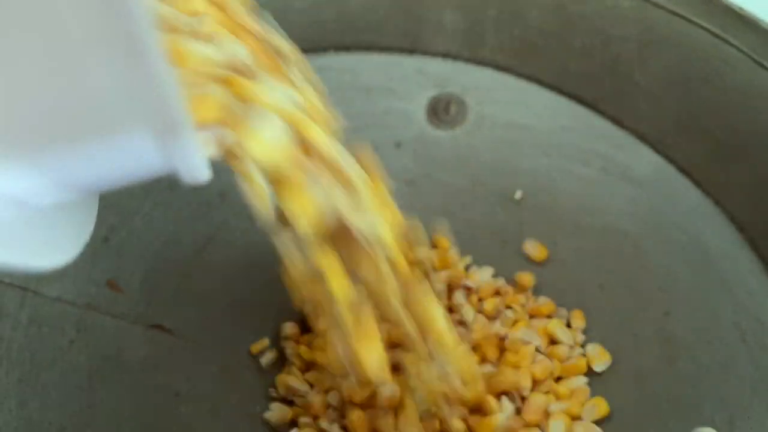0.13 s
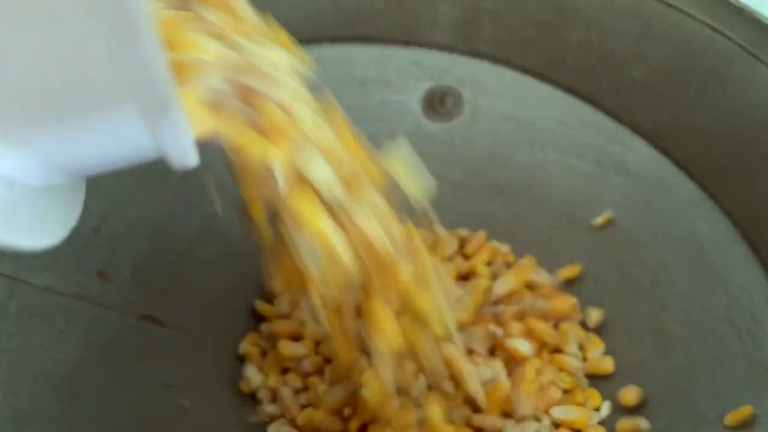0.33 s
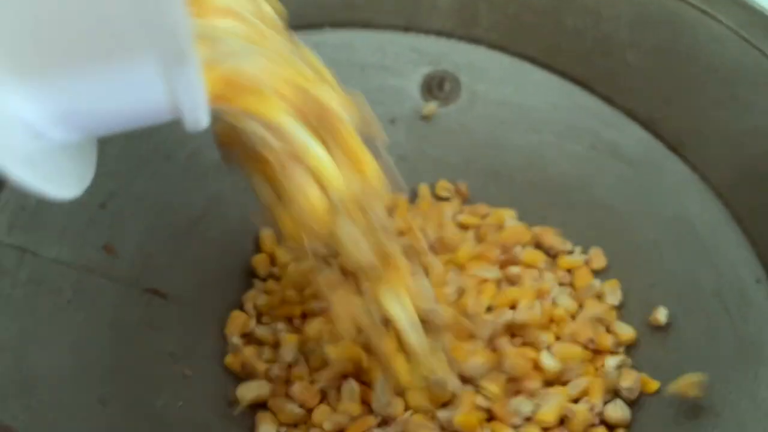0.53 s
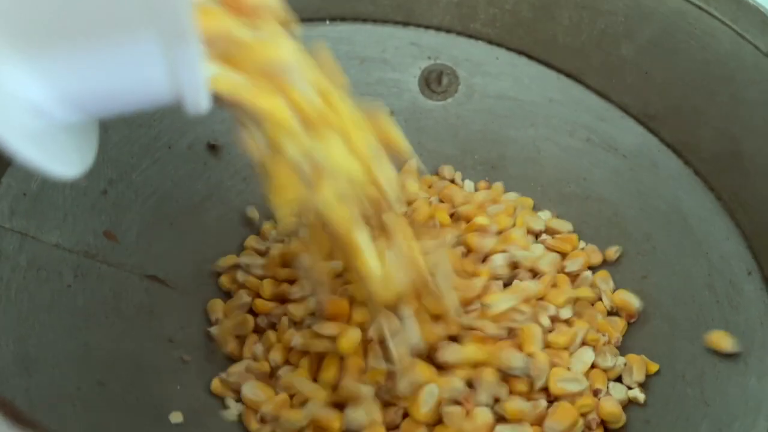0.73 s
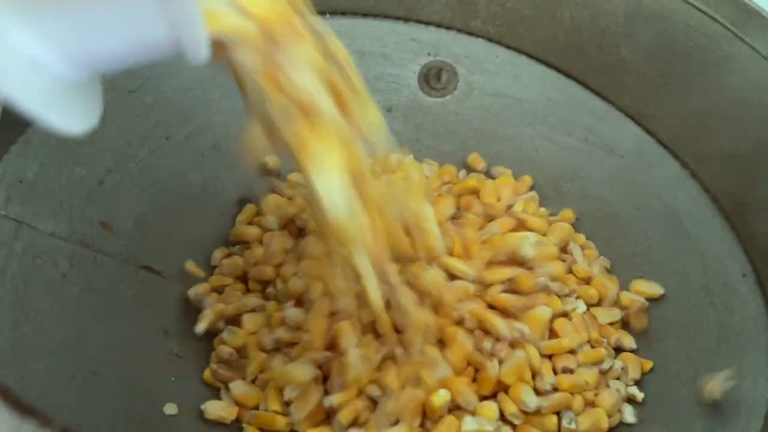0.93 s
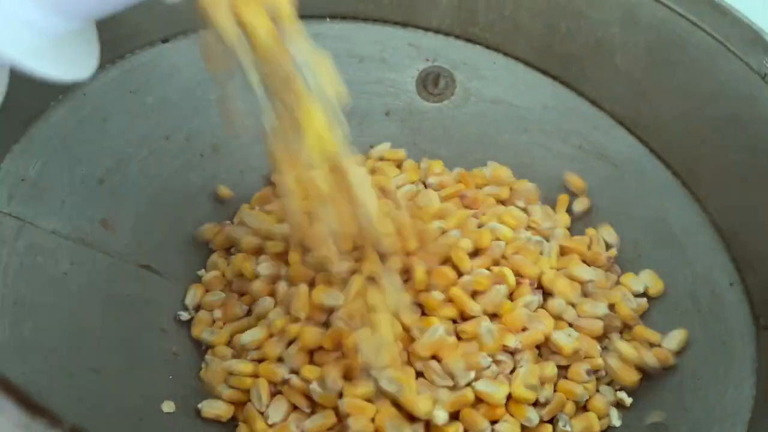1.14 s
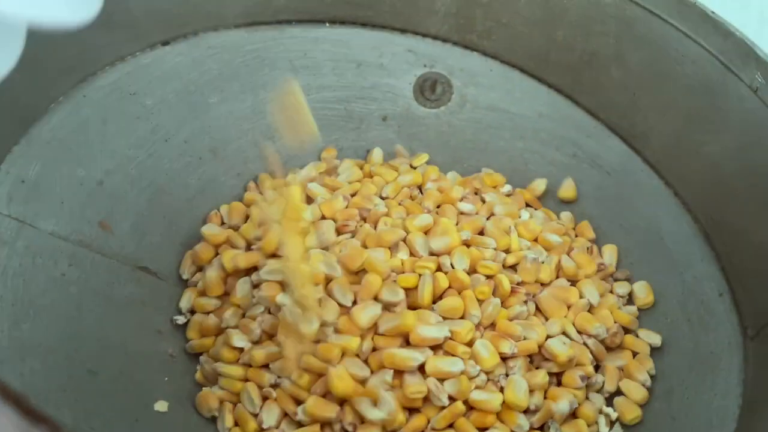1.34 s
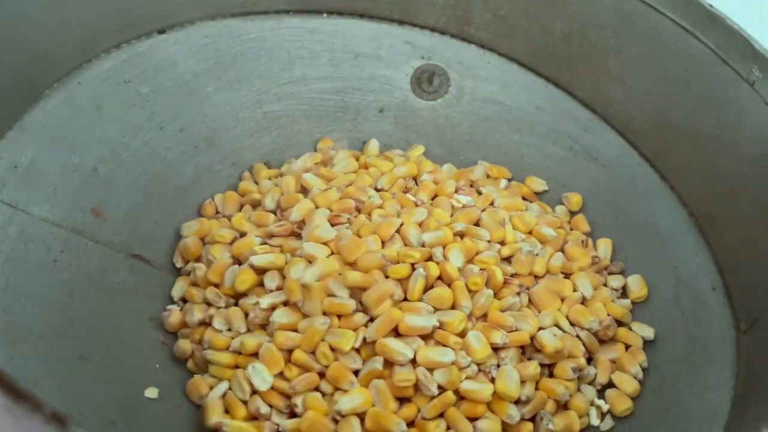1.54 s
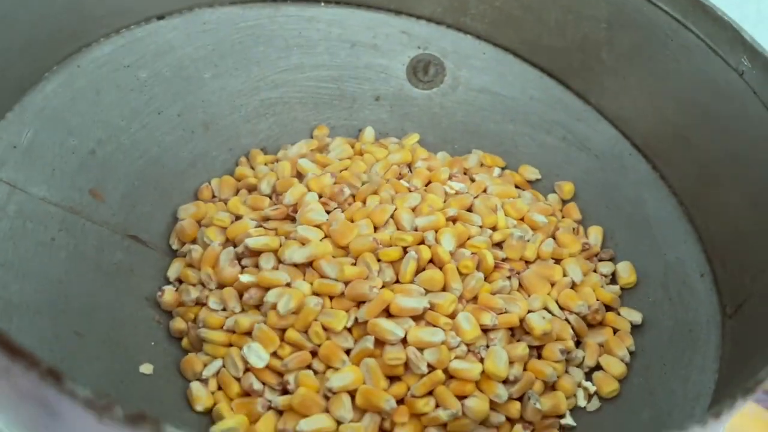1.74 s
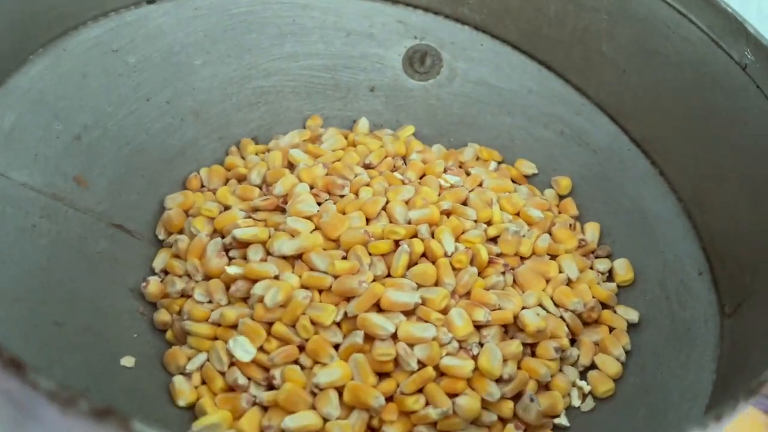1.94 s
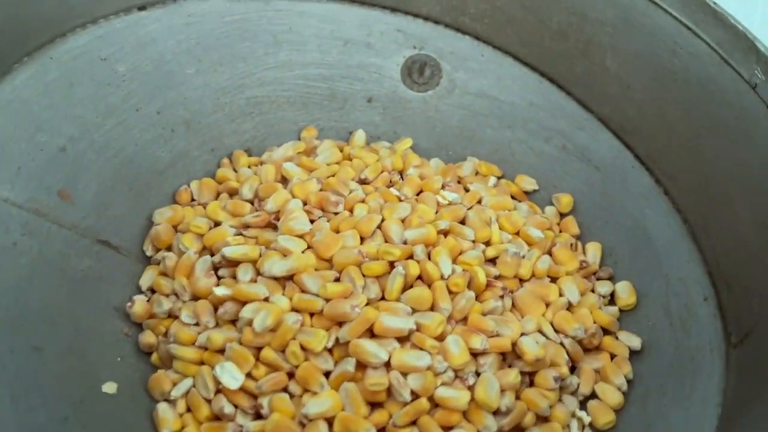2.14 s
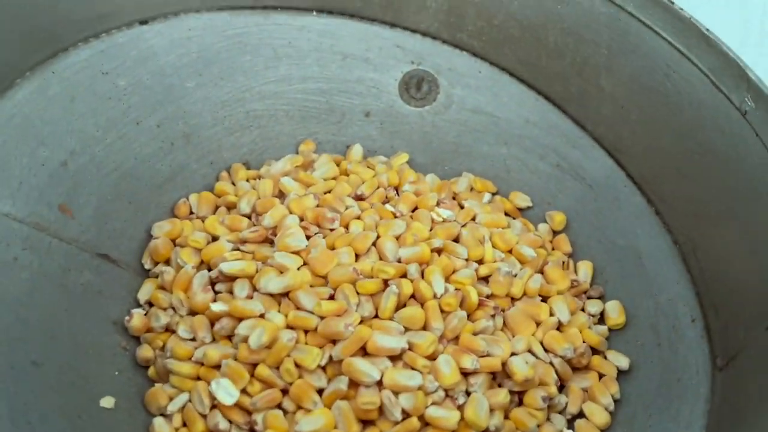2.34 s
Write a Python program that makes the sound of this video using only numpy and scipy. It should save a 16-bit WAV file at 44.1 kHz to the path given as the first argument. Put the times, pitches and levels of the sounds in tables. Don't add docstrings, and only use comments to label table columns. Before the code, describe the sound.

Dense bright rattle of corn poured into a metal hopper, stopping before a hollow cup scrape and bump

```python
import sys
import numpy as np
from scipy import signal
from scipy.fft import rfft, irfft
from scipy.io import wavfile
from scipy.ndimage import uniform_filter1d

SR = 44100
rng = np.random.default_rng(int(sys.argv[2]) if len(sys.argv) > 2 else 0)


def inscribe(sig):
    pcm = np.round(np.clip(np.atleast_2d(sig).T, -1, 1) * 32767)
    wavfile.write(sys.argv[1], SR, pcm.astype(np.int16))


def voltage_ratio(level):
    return 10 ** (np.asarray(level, float) / 20)


N = 110029
T = np.arange(N) / SR

# freq_hz, density_db_per_hz
SHOP_SPECTRUM = [(32, -49), (58, -1), (110, -9), (220, -13.5), (600, -18), (2300, -22), (9000, -31.5),
                 (13000, -58)]
# time_s, level_db
SHOP_LEVEL = [
    (0, -69),
    (.5, -69),
    (.85, -55.5),
    (1.7, -57.5),
    (2.1, -50),
    (2.49, -59.5),
]

# time_s, scrape_db, hollow_db, hollow_hz
CUP_DRAG = [(1.62, -56, -50, 318.6), (1.655, -46, -57, 320), (1.76, -42.5, -44.5, 314.6),
            (1.86, -46.5, -49, 325), (1.93, -41, -37, 337.8), (1.945, -37, -31, 339),
            (2.03, -33, -32.5, 355.6), (2.07, -33.5, -40, 345.8), (2.14, -30.5, -38, 348.2),
            (2.17, -34.5, -48.5, 334.8), (2.3, -37.5, -54, 335), (2.4, -44.5, -59.5, 331.8),
            (2.47, -54.5, -72, 341.7)]
# freq_hz, density_db_per_hz
SCRAPE_SPECTRUM = [(200, -35), (500, -17), (1100, -6.5), (2200, 3), (3500, -6), (8500, -13), (11400, -11.5),
                   (12500, -40)]
# freq_hz, width_hz, level_db
CUP_WALLS = [(1210, 210, -16.5), (1630, 380, -16.5), (2140, 68, -17.5), (2280, 320, -16)]
# time_s, level_db
FLANK_PRESSURE = [
    (1.62, -24),
    (1.93, -19),
    (1.97, -6.5),
    (2.11, -9.5),
    (2.17, -39),
]
FLANK_HZ, FLANK_WIDTH_HZ, HOLLOW_WIDTH_HZ = 830, 26, 42
GRIT_PER_S, GRIT_SCATTER_DB = 5000, 0.5
# start_s, level_db, pitch_hz, t60_s
CUP_BUMPS = [
    (2.205, -28.5, 134, 0.038),
    (2.251, -27, 61.6, 0.083),
]

# freq_hz, width_hz, level_db
BOWL_MODES = [(298.3, 30.4, -2.5), (495, 83, 0), (1005, 175, -4.5), (1906, 100, 1.5), (2360, 84, 1.5)]
# time_s, level_db
BOWL_LEVEL = [(0, -57), (.3, -55), (.75, -51.5), (.9, -48.5), (1.05, -49.5), (1.17, -48), (1.28, -53),
              (1.4, -58), (1.64, -67)]

# time_s, level_db, kernels_per_s
STREAM_FLOW = [(0, -25, 4760), (.05, -27.5, 4930), (.2, -31, 5000), (.3, -32.5, 4900), (.7, -34.5, 4890),
               (.88, -30, 5700), (1, -33.5, 4920), (1.2, -34.5, 5130), (1.27, -35.5, 3400),
               (1.33, -44.5, 1200), (1.4, -50, 480), (1.5, -59.5, 300), (1.64, -63, 240)]
# start_s, peak_db, loudest_hz
CLUMPS = [(.003, -14.5, 5930), (.012, -18.5, 7950), (.021, -21, 5540), (.027, -16, 4280),
          (0.049, -18, 8000), (0.072, -22, 3500), (0.114, -14, 3300), (0.165, -19, 3480),
          (1.106, -19.5, 6000),
          (0.0634, -13.5, 6200), (0.1029, -12.5, 5900), (0.1573, -11.5, 5600), (0.1731, -12.5, 5340),
                 (0.231, -25, 6000), (0.2485, -19, 5300), (0.2955, -27, 4300), (0.3204, -20.5, 4600),
                 (0.3326, -25, 3400), (0.3502, -21, 4580), (0.3901, -20, 7050), (0.3948, -24, 7140),
                 (0.4176, -19, 6300), (0.475, -19, 5100), (0.4882, -20.5, 6300), (0.5323, -22, 5523),
                 (0.5552, -22, 4700), (0.5621, -20, 6700), (0.6003, -37, 5000), (0.6136, -24, 5100),
                 (0.6675, -23, 3020), (0.6861, -42, 7900),
          (0.7204, -21, 7360), (0.7346, -17.5, 3750), (0.752, -36, 5600), (0.785, -24, 9400),
               (0.8012, -34, 8400), (0.8427, -49, 6400), (0.8804, -35, 8700), (0.9038, -21, 3900),
               (0.91, -22, 7400), (0.9246, -19, 5200), (0.9315, -17, 7000), (0.9648, -17, 4100),
               (1.0091, -29, 8080), (1.0178, -32, 6200), (1.0443, -31, 7300), (1.0704, -15.5, 5400),
               (1.0885, -15.5, 4050), (1.0997, -15.5, 5200), (1.134, -21.5, 6200), (1.1522, -15.5, 4220),
               (1.1832, -17, 4166), (1.2238, -23, 5900), (1.2324, -34, 6700), (1.248, -36, 6960),
               (1.2554, -25.5, 8010)]
# start_s, peak_db, loudest_hz
LONE_KERNELS = [(1.3139, -30, 7500), (1.3229, -21.5, 3650), (1.335, -32, 7200), (1.3492, -42, 8560),
                (1.3655, -40, 8000), (1.3762, -49, 5300), (1.3873, -30, 3600), (1.393, -38, 6760),
                (1.3993, -45, 4800), (1.4239, -34.5, 8170), (1.457, -43, 6200), (1.4734, -34, 2475),
                (1.4855, -39.5, 6130), (1.4973, -45, 3100), (1.534, -40.5, 4440), (1.543, -41, 9160),
                (1.5619, -21.5, 3170), (1.5863, -50, 3770), (1.593, -34, 4900), (1.6019, -34.5, 3500),
                (1.307, -34, 9000), (1.361, -37, 9000), (1.3838, -33, 9000), (1.404, -44, 5000),
                 (1.418, -37.5, 5950), (1.322, -24, 4400), (1.5618, -37.5, 2460), (1.5617, -31.5, 7950),
                 (1.5627, -21.5, 1000), (2.156, -38, 11500), (2.385, -48, 10000), (1.606, -53, 4500),
                 (1.569, -40, 2420), (1.741, -37, 5030), (1.803, -38, 2500), (1.8946, -45, 5000),
                 (1.939, -40, 4000), (1.96, -33.5, 7460), (2.479, -52, 2820)]
CLUMP_SPREAD_S, CLUMP_DB, LONE_SPREAD_S, LONE_DB = 0.0042, 1, 0.0012, 11.5

# freq_hz, density_db_per_hz
TICK_SPECTRUM = [(300, -42), (800, -19), (2000, -3), (3000, -5.5), (8500, 0.5), (11000, 9), (12400, -4.5),
                 (14500, -15)]
# time_s, level_db
GLINT_LEVEL = [(0, -7), (.6, -6), (.8, 5.5), (1.3, 6.5)]
GLINT_HZ = 13000
FOCUS_DB, FOCUS_FLOOR_DB = 9, 14
TICK_CYCLES, SCATTER_DB, COLOUR_DB = 12, 2.5, 2
# freq_hz, level_db, t60_s
STEEL_MODES = [(1470, -4.5, 0.18), (1952, -0.5, 0.1), (2365, 5.5, 0.066), (3293, 2.5, .06),
               (3786, 0.5, 0.09), (4400, 2, 0.057), (4700, 2, 0.056), (5700, -3.5, 0.073),
               (6000, 2.5, 0.053), (6670, -6, 0.097), (7650, 4.5, 0.054), (7850, 4, 0.035),
               (8290, 5.5, 0.041), (8520, 8.5, 0.023)]
# time_s, level_db
STEEL_RING = [
    (0, -2),
    (.3, -3.5),
    (1.2, -21.5),
    (1.64, -7.5),
]
TAIL_T60_S, TAIL_DB = 0.02, 1

# freq_hz, level_db
ECHO_SPECTRUM = [(120, -19), (450, -14), (1200, 1), (2200, -2.5), (6000, -8.5), (9000, -7.5), (10300, -47),
                 (16000, -11)]
# freq_hz, phase_rad
PORT_LEAD = [(700, 0.3), (1150, -0.26), (1450, -1.97), (2000, 0.18), (2800, 0.26), (5500, 0.92),
             (6500, 0.64), (7600, 0.8), (8300, -0.61),
             (9000, -.5), (9900, -.94 * np.pi), (10400, -1.06 * np.pi), (11800, -2 * np.pi),
                    (12400, -2 * np.pi), (13100, -3 * np.pi), (14400, -3 * np.pi), (15000, -4 * np.pi)]
# freq_hz, level_db
PORT_BALANCE = [(100, 0.5), (1100, 3), (1800, -1.5), (5000, 3.5), (8300, 0.5)]
ECHO_T60_S, CUP_ECHO_DB, CUP_LEAD_RAD = 0.039, 4.5, 0.9
TOP_HZ = 15750


def level(x, db):
    return x * voltage_ratio(db) / np.sqrt(np.mean(x ** 2))


def curve(table, column=1, times=T):
    rows = np.array(table)
    return np.interp(times, rows[:, 0], rows[:, column])


def along(table, hz):
    rows = np.array(table)
    return np.interp(np.log(np.maximum(hz, 1)), np.log(rows[:, 0]), rows[:, 1])


def colour(x, table):
    hz = np.fft.rfftfreq(N, 1 / SR)
    return irfft(rfft(x) * voltage_ratio(along(table, hz)), N)


def ring(x, hz, t60_s):
    pole = np.exp(2j * np.pi * hz / SR - np.log(1000) / (t60_s * SR))
    return signal.lfilter([1], [1, -pole], x).imag * np.sqrt(1 - abs(pole) ** 2)


def band(x, hz, width_hz):
    return ring(x, hz, np.log(1000) / (np.pi * width_hz))


def train(times, sizes):
    index = np.clip((times * SR).astype(int), 0, N - 1)
    return np.bincount(index, sizes, N)


def walk(rate_hz):
    hold = int(SR / rate_hz)
    steps = np.repeat(rng.standard_normal(N // hold + 1), hold)
    return 1.3 * uniform_filter1d(uniform_filter1d(steps, hold), hold)[:N]


def heavy_tail():
    return np.minimum(rng.exponential(size=N), 4)


def grit(per_s, scatter_db):
    hit = rng.random(N) < per_s / SR
    return hit * rng.standard_normal(N) * voltage_ratio(scatter_db * heavy_tail())


def shop():
    noise = level(colour(rng.standard_normal(N), SHOP_SPECTRUM), 0)
    return noise * voltage_ratio(curve(SHOP_LEVEL) + 2.1 * walk(5.56))


def cup_walls(rub):
    walls = level(colour(rub, SCRAPE_SPECTRUM), 0.43)
    for hz, width_hz, db in CUP_WALLS:
        walls = walls + level(band(rub, hz, width_hz), db)
    flank = level(band(rub, FLANK_HZ, FLANK_WIDTH_HZ), 0)
    return walls + flank * voltage_ratio(curve(FLANK_PRESSURE))


def cup_hollow():
    push = grit(1200, 2.9) + 1j * grit(1200, 2.0)
    slow = signal.lfilter([1], [1, -np.exp(-np.pi * HOLLOW_WIDTH_HZ / SR)], push)
    smooth = uniform_filter1d(slow.real, size=201) + 1j * uniform_filter1d(slow.imag, size=201)
    phase = 2 * np.pi * np.cumsum(curve(CUP_DRAG, column=3)) / SR
    return level((smooth * np.exp(1j * phase)).real, 0)


def cup_bump(start_s, db, hz, t60_s):
    u = np.maximum(T - start_s, 0)
    swell = 1 - np.exp(-u * hz * 3.8)
    return voltage_ratio(db) * np.sin(2 * np.pi * hz * u) * swell * np.exp(-np.log(1000) * u / t60_s)


def cup():
    rub = grit(GRIT_PER_S, GRIT_SCATTER_DB) * voltage_ratio(0.73 * walk(70))
    scrape = cup_walls(rub) * voltage_ratio(curve(CUP_DRAG))
    hollow = cup_hollow() * voltage_ratio(curve(CUP_DRAG, column=2))
    fade_in = np.clip((T - CUP_DRAG[0][0]) / 0.013, 0, 1)
    return (scrape + hollow) * fade_in + sum(cup_bump(*row) for row in CUP_BUMPS)


def bowl():
    push = grit(1500, 2.3) * voltage_ratio(0.8 * walk(10.7))
    hum = 0
    for hz, width_hz, db in BOWL_MODES:
        mode = band(band(push, hz, 1.59 * width_hz), hz, 1.58 * width_hz)
        hum = hum + voltage_ratio(db) * mode * np.sqrt(width_hz)
    fade_out = np.clip((BOWL_LEVEL[-1][0] - T) / 0.026, 0, 1)
    return level(hum, 5.86) * voltage_ratio(curve(BOWL_LEVEL)) * fade_out


def stream():
    per_s = np.maximum(curve(STREAM_FLOW, column=2), 50)
    surge = voltage_ratio(3 * walk(60))
    scatter_db = SCATTER_DB * heavy_tail()
    lands = rng.random(N) < per_s * surge / SR * (T < STREAM_FLOW[-1][0])
    db = curve(STREAM_FLOW) + scatter_db - 10 * np.log10(per_s / SR) - 14
    return T[lands], db[lands], 0 * T[lands]


def strikes(table, spread_s, db, count):
    rows = np.array(table)
    order = (np.arange(count) + rng.random((len(rows), count))) / count
    late = order ** 2 * 3.5 - 0.5
    fall_db = np.where(late < 0, -20, 5) * late - 3.1 * (abs(late) < 0.1)
    times = rows[:, :1] + spread_s * late
    return times.ravel(), (rows[:, 1:2] + db - fall_db).ravel(), np.repeat(rows[:, 2], count)


def focus_loss_db(hz, loudest_hz):
    octaves = np.log2(hz / np.maximum(loudest_hz, 1))
    return (loudest_hz > 0) * np.minimum(FOCUS_DB * octaves ** 2, FOCUS_FLOOR_DB)


def kernel_ticks(times, db, loudest_hz):
    ticks = 0
    fade = np.exp(-2 * np.log(1000) / (TAIL_T60_S * SR))
    for hz in 700 * 2 ** np.arange(0, 4.6, 1 / 3):
        sign, own_colour = rng.standard_normal((2, len(times)))
        glint_db = (hz > GLINT_HZ) * curve(GLINT_LEVEL, times=times)
        size = voltage_ratio(db + COLOUR_DB * own_colour - focus_loss_db(hz, loudest_hz) + glint_db)
        power = signal.lfilter([1 - fade], [1, -fade], train(times, size ** 2))
        hiss = np.sqrt(power + 1e-18) * rng.standard_normal(N)
        push = train(times, np.sign(sign) * size) + voltage_ratio(TAIL_DB) * hiss
        ticks = ticks + ring(push, hz, TICK_CYCLES / hz) * np.sqrt(hz / 5000)
    return colour(ticks, TICK_SPECTRUM)


def steel_wall(times, db, loudest_hz):
    wall = 0
    steel_db = curve(STEEL_RING, times=times)
    for hz, mode_db, t60_s in STEEL_MODES:
        gain = voltage_ratio(db + steel_db + mode_db - focus_loss_db(hz, loudest_hz))
        wall = wall + ring(train(times, rng.standard_normal(len(times)) * gain), hz, t60_s)
    return signal.sosfilt(signal.butter(3, 1200, "high", fs=SR, output="sos"), wall)


def kernels():
    clumps = strikes(CLUMPS, CLUMP_SPREAD_S, CLUMP_DB, count=24)
    lone = strikes(LONE_KERNELS, LONE_SPREAD_S, LONE_DB, count=4)
    hits = [np.concatenate(part) for part in zip(clumps, lone, stream())]
    return kernel_ticks(*hits) + steel_wall(*hits)


def ports(x, echo_db, lead_rad):
    hz = np.fft.rfftfreq(N, 1 / SR)
    phase = along(PORT_LEAD, hz) + lead_rad * np.exp(-hz / 2500)
    half = voltage_ratio(along(PORT_BALANCE, hz) / 2) * np.exp(0.5j * phase)
    tail = rng.standard_normal(N) * np.exp(-np.log(1000) * T / ECHO_T60_S)
    tail = tail / np.sqrt(np.sum(tail ** 2))
    echo = voltage_ratio(along(ECHO_SPECTRUM, hz) + echo_db) * rfft(tail) * rfft(x * walk(39.97))
    direct = rfft(x)
    return irfft(np.array([half * (direct + echo), (direct - echo) / half]), N)


def scene():
    side = ports(cup(), CUP_ECHO_DB, CUP_LEAD_RAD)
    front = ports(shop() + bowl() + kernels(), 0, 0)
    return side + front


def roll_off(x):
    return signal.sosfilt(signal.butter(12, 16000, fs=SR, output="sos"), x)


def record(dry):
    low_pass = signal.ellip(8, 0.2, 70, TOP_HZ, fs=SR, output="sos")
    mix = signal.sosfilt(low_pass, dry)
    return roll_off(mix)


dry = scene()
out = record(dry)
inscribe(out)
```